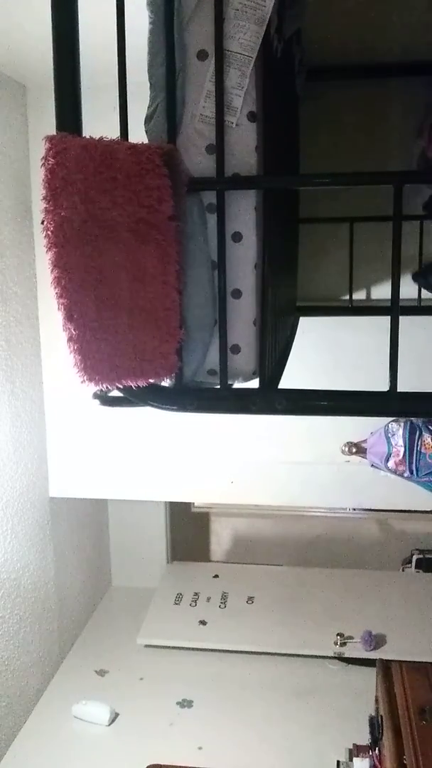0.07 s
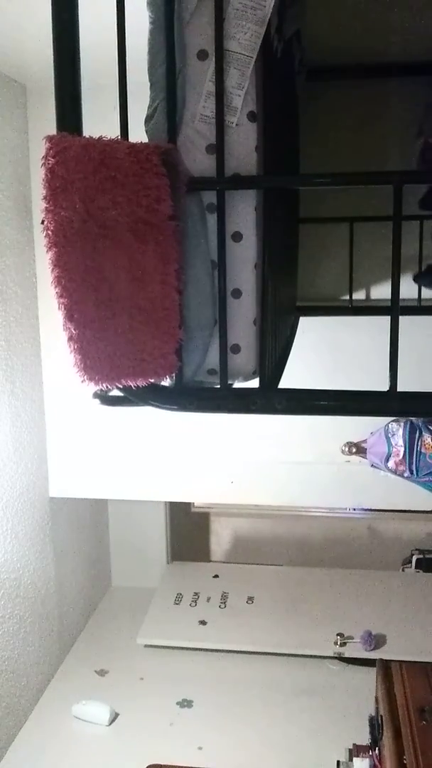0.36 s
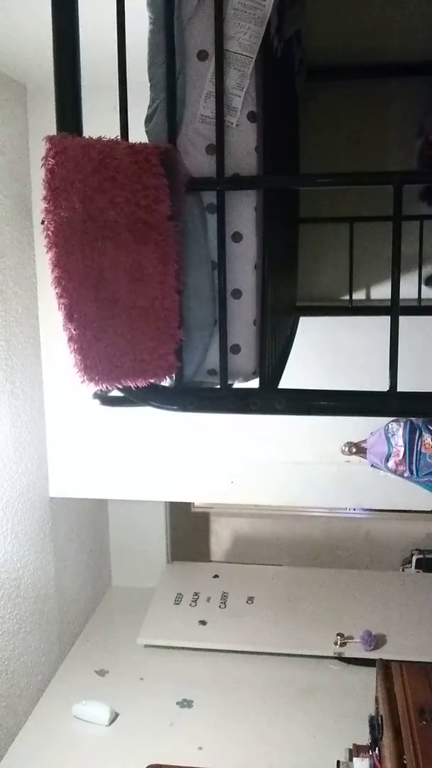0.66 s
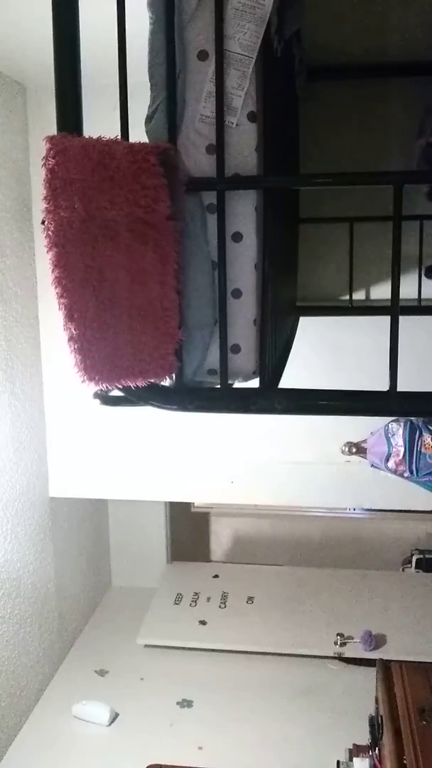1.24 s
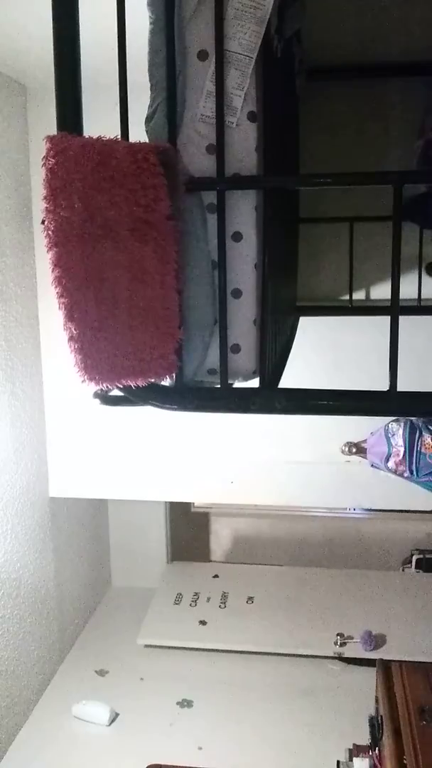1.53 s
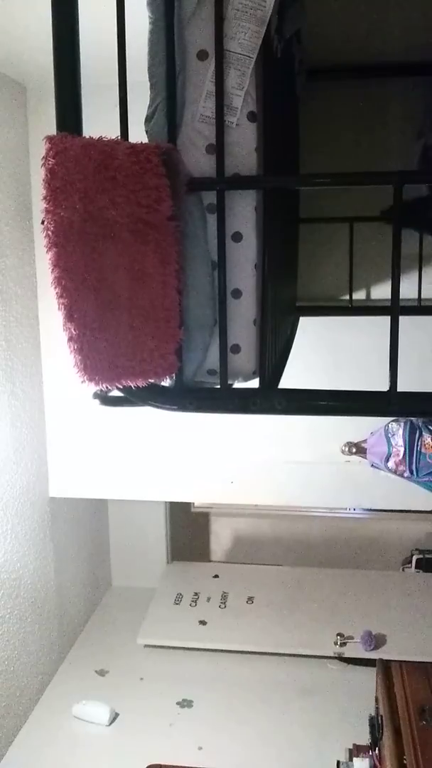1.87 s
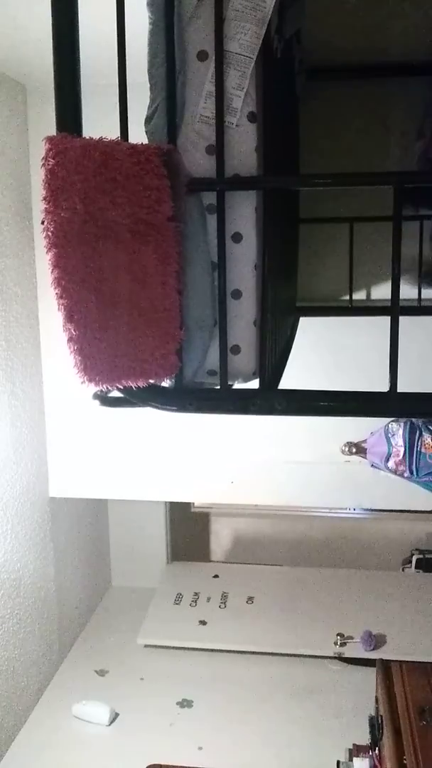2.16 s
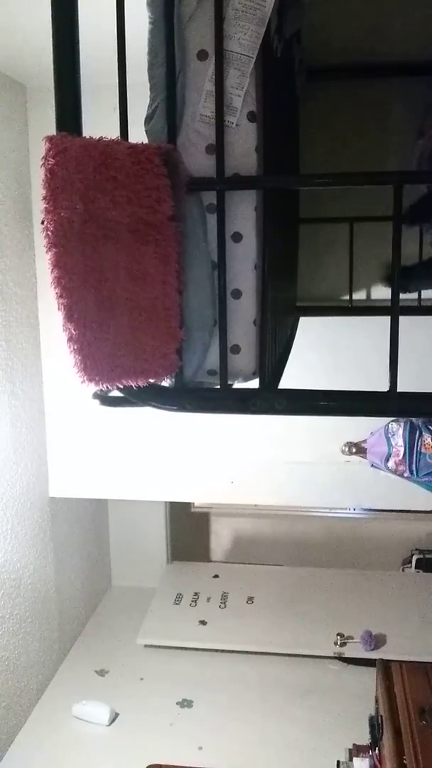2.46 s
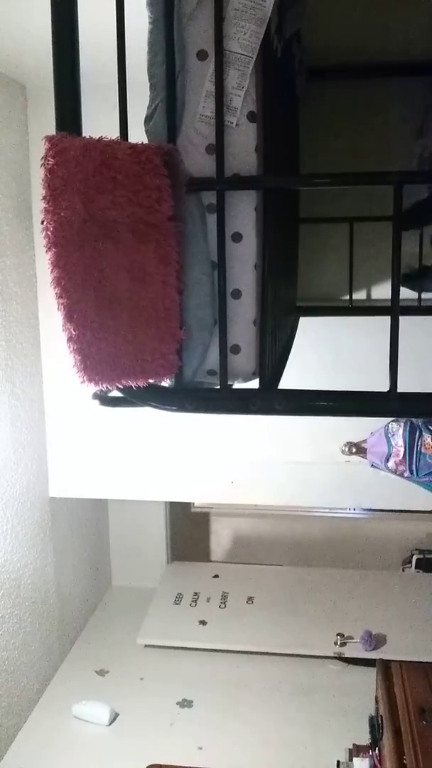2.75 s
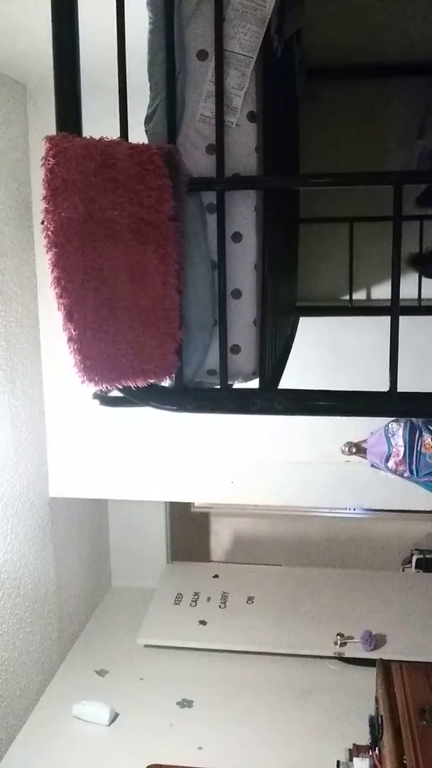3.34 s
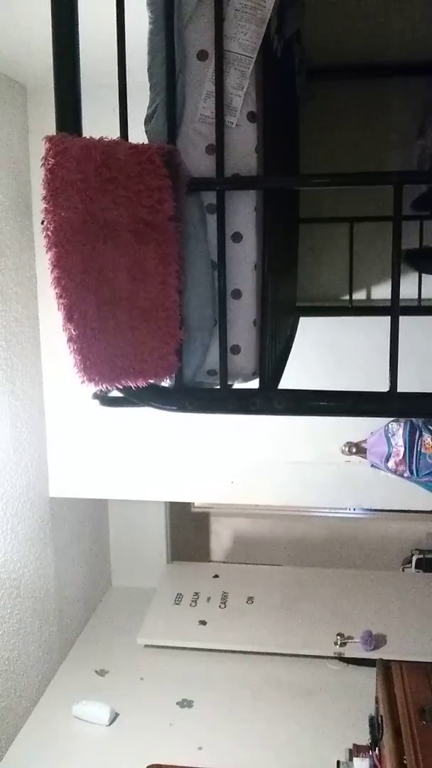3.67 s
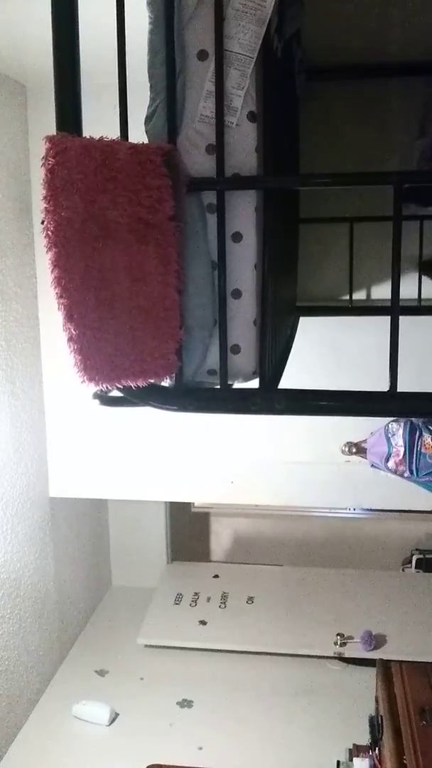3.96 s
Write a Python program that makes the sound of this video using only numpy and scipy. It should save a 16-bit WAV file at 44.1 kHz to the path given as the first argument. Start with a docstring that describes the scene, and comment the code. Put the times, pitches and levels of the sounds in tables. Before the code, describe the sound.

Irregular scratchy rustles come in brief clusters over steady hum and hiss in a bedroom.

```python
"""A small bedroom, where something dry, perhaps fabric, is scratched and rustled in short uneven strokes.
Each stroke is stick-slip friction: a dense run of tiny slips that rings briefly in the room.
A fan-like rush, a faint hum and hiss lie below, and the hand-held recorder is softly bumped and
knocked a few times. The stereo image of its two ports is widened by cross-subtraction."""
import sys
import numpy as np
from scipy import signal
from scipy.fft import rfft, irfft, next_fast_len
from scipy.io import wavfile
from scipy.ndimage import uniform_filter1d

SR = 44100
rng = np.random.default_rng(int(sys.argv[2]) if len(sys.argv) > 2 else 0)


def transcribe(u):
    """Save the signal u as a 16-bit wav file named by the first command-line argument.

    u: samples, shape (n,) or (channels, n), limited to [-1, 1]; the rate is SR.
    q: integer samples, one column per channel.
    """
    v = np.clip(np.atleast_2d(u).T, -1, 1)
    q = np.round(v * 32767).astype(np.int16)
    wavfile.write(sys.argv[1], SR, q)


N = 176400
TIME = np.arange(N) / SR
FFT_SIZE = next_fast_len(N + SR)
FREQS = np.arange(FFT_SIZE // 2 + 1) * SR / FFT_SIZE
SIDES = np.array([[1], [-1]])  # left, right
PORT_LAG_S = 0.0004441

# scratch strokes (start [s], length [s], relative level [dB], tilt [dB/octave])
STROKES = [(0.0, 0.0019, -43.5, -6), (0.251, 0.025, -47.5, -0.5), (.364, 0.031, -36, -1),
           (0.409, 0.058, -42, -3), (0.516, .09, -65, -11), (0.737, 0.061, -39.5, -0.5),
           (0.869, 0.062, -51.5, -2), (0.926, 0.011, -45, 10.5), (0.935, 0.0033, -45.5, -4),
           (1.065, 0.025, -47.5, 1.5), (1.235, 0.036, -36, -1.5), (1.276, 0.027, -47, -2.5),
           (1.366, 0.025, -48.5, 0), (1.535, 0.041, -38.5, 0), (1.688, 0.023, -39, -2),
           (1.833, .07, -61, 0), (1.911, 0.012, -53, 1.5), (1.984, 0.013, -57.5, -8),
           (2.134, 0.026, -44, -6.5), (2.233, 0.023, -45, 3.5), (2.303, .1, -63.5, -1),
           (2.42, 0.022, -47.5, -4), (2.512, 0.063, -38, 0), (2.582, 0.019, -44.5, -2.5),
           (2.771, 0.017, -44, -5), (2.868, 0.044, -41.5, -2), (2.927, 0.02, -41.5, 2),
           (3.04, 0.043, -51.5, -1), (3.308, 0.016, -46, 0.5), (3.423, 0.04, -49.5, -2.5),
           (3.451, 0.081, -43, -0.5), (3.603, 0.015, -52.5, -4.5), (3.707, 0.032, -49, -4.5),
           (3.758, 0.077, -37.5, 1), (3.903, 0.025, -35.5, 3), (3.973, .028, -48.5, 0)]
# broad spectrum of the scratched surface (frequency [Hz], relative level [dB])
SURFACE_SPECTRUM = [(150, -34), (500, 4.5), (2600, 2.5), (3800, 2.5), (7200, 5.5), (8500, -0.5),
                    (10500, -0.5), (12000, 4), (14500, -25.5)]
# narrow, steady treble peaks that the room gives every scratch (frequency [Hz], gain [dB])
ROOM_RESONANCES = [(2995, 4), (3150, 5), (3230, 5), (3600, 5.5), (4985, 6.5), (5615, 4), (5725, 3.5),
                   (5912, 10.5), (5985, 6), (7150, 5.5), (8162, 8.5), (10730, -0.5), (12170, 4.5)]
# cross-subtraction of the reverberation (frequency [Hz], share of the other port [ratio])
REVERB_CROSS = [(400, .02), (2200, 1), (4400, 0.35), (6000, 0.016), (9000, 0.084), (12000, 0.26)]
# spectrum of the rush (frequency [Hz], relative level [dB])
RUSH_SPECTRUM = [(20, -25), (55, -4), (500, -0.1), (800, -0.5), (1150, -3), (1600, -5.5), (2200, -22),
                 (4000, -42)]
# slow swell of its upper band (time [s], gain [dB])
RUSH_SWELL = [(0, -4), (.55, -0.5), (1.1, 0), (1.35, 2.5), (2.08, -0.5), (2.6, 3), (2.95, 3.5),
              (3.75, -1.8)]
# its balance (frequency [Hz], left minus right [dB])
RUSH_BALANCE = [(60, -6), (130, -2.5), (350, 1.5), (600, -1.5), (1100, -0.5)]
# its stereo image (frequency [Hz], coherence [0-1], phase lead of the right [rad])
RUSH_IMAGE = [(55, .87, -1.8), (260, .7, -.7), (470, .75, .1), (680, .45, .9), (880, .8, 0),
              (1150, .98, .05), (1400, .87, .6), (1700, .8, 1.6), (2200, .95, 3.1)]
# spectrum of the hiss (frequency [Hz], relative level [dB])
HISS_SPECTRUM = [(2200, 10.5), (4500, 7), (9000, 4.5), (12000, 5), (14400, -6.5)]
# cross-subtraction of the hiss (frequency [Hz], share of the other port [ratio])
HISS_CROSS = [(2200, 1), (4500, 0.38), (6000, 0.08), (12000, 0.063)]
# rise of the hum (time [s], level [dB])
HUM_LEVEL = [(3.1, -73), (3.4, -55)]
# soft bumps of the hand (start [s], length [s], level [dB], resonance [Hz])
BUMPS = [(1.226, 0.029, -44, 215), (1.828, 0.092, -44.5, 106), (1.833, 0.016, -39.5, 580),
         (1.863, 0.029, -39.5, 330), (2.195, 0.038, -39.5, 217), (2.198, 0.045, -40, 477),
         (2.23, 0.015, -36, 112), (2.287, 0.016, -37.5, 445), (2.777, 0.014, -39.5, 604),
         (2.787, 0.046, -42.5, 380)]
# fingertip knocks on the case (centre time [s], envelope peak [dB], frequency [Hz])
KNOCKS = [(1.6372, -27.5, 303), (2.2565, -31.5, 263)]


def from_db(db):
    """Amplitude grows tenfold for every 20 dB."""
    return 10 ** (np.asarray(db) / 20)


def unit_rms(x):
    """Normalisation to unit mean power."""
    return x / np.sqrt(np.mean(x ** 2) + 1e-20)


def at_hz(points):
    """Interpolation of a table on a log-frequency axis."""
    hz, value = np.transpose(points)
    return np.interp(np.log(FREQS + 1), np.log(hz), value)


def filtered(x, response):
    """Convolution in time is multiplication in frequency."""
    return irfft(rfft(x, FFT_SIZE) * response, FFT_SIZE)[..., :N]


def minimum_phase(gain):
    """Causality: a response with this gain that rings only after it is excited."""
    cepstrum = irfft(np.log(gain + 1e-9), FFT_SIZE)
    return np.exp(rfft(cepstrum * (1 + np.sign(np.fft.fftfreq(FFT_SIZE)))))


def add(out, start, sound):
    """Superposition: a sound joins the mix at its start time."""
    i = int(start * SR)
    part = sound[..., :N - i]
    out[..., i:i + part.shape[-1]] += part


def port_delay():
    """Travel time between the ports gives a phase lag proportional to frequency."""
    return np.exp(-2j * np.pi * FREQS * PORT_LAG_S)


def widen(ports, shares):
    """Differential pickup: each channel is its own port minus a delayed share of the other."""
    share = np.clip(at_hz(shares), 0, 1)
    norm = 1 / np.sqrt(1 + share ** 2)
    return filtered(ports, norm) - filtered(ports[::-1], norm * share * port_delay())


def contact_pressure(t, length, sag_db_per_s=59, release_s=0.01):
    """Contact envelope: pressure builds, more slowly in a long stroke, then sags and lets go."""
    attack_s = 0.0056 + 0.18 * length
    release = np.exp(-np.maximum(t - length, 0) / release_s)
    return np.clip(t / attack_s, 0, 1) * from_db(-sag_db_per_s * t) * release


def slips(slips_per_s=2800, size_spread_db=2, spot_spread_db=0.9):
    """Stick-slip friction: each stroke releases a random train of impulses of uneven size."""
    out, size = np.zeros(N), SR // 4
    t = np.arange(size) / SR
    octaves = np.log2(np.clip(np.fft.rfftfreq(size, 1 / SR), 1500, SR / 2) / 6000)
    knots = np.linspace(octaves[0], octaves[-1], 24)
    for start, length, db, tilt in STROKES:
        strengths = from_db(size_spread_db * np.minimum(rng.exponential(1, size), 4))
        strengths *= rng.choice([-1, 1], size)
        impulses = unit_rms(strengths * (rng.random(size) < slips_per_s / SR))
        # each stroke meets a different spot of the surface, with its own colour
        spot = np.interp(octaves, knots, rng.standard_normal(len(knots)))
        tint = from_db(db + tilt * octaves + spot_spread_db * spot)
        add(out, start, irfft(rfft(impulses * contact_pressure(t, length)) * tint, size))
    return out


def scratches(peak_width_hz=54, source_db=-0.03, direct_db=-1, reverb_db=0.5):
    """Source and filter: slips take the surface's colour and the room's resonances, then reverberate."""
    room_peaks_db = sum(db / (1 + (2 * (FREQS - hz) / peak_width_hz) ** 2) for hz, db in ROOM_RESONANCES)
    colour = unit_rms(from_db(at_hz(SURFACE_SPECTRUM) + room_peaks_db))
    source = from_db(source_db) * filtered(slips(), minimum_phase(colour))
    far_port = np.where(FREQS > 700, -port_delay(), 1)  # late and inverted above 700 Hz
    direct = np.array([source, filtered(source, far_port)])
    return from_db(direct_db) * direct + from_db(reverb_db) * widen(bedroom(source), REVERB_CROSS)


def bedroom(x, t60_s=0.27, treble_t60_s=0.16, smoothing_hz=90):
    """Reverberation: diffuse reflections decay exponentially at both ports, the treble sooner."""
    white = rng.standard_normal((2, N))
    low = filtered(white, 1 / (1 + (FREQS / 7000) ** 4))
    tail = low * from_db(-60 * TIME / t60_s) + (white - low) * from_db(-60 * TIME / treble_t60_s)
    response = rfft(tail * (TIME > 0.003), FFT_SIZE)  # first reflection after 3 ms
    band_power = uniform_filter1d(abs(response) ** 2, size=int(smoothing_hz * FFT_SIZE / SR))
    mid, side = response / np.sqrt(band_power)  # even in colour
    return filtered(x, (mid + SIDES * side) / np.sqrt(2))


def rush(base_db=-42, swell_from_hz=850):
    """Partial coherence: fan-like noise, partly alike in both channels, whose upper band swells."""
    coherence = at_hz([(hz, alike) for hz, alike, _ in RUSH_IMAGE])
    phase = at_hz([(hz, lead) for hz, _, lead in RUSH_IMAGE])
    mid, side = rng.standard_normal((2, N))
    air = filtered(mid, np.sqrt(1 + coherence)) + SIDES * filtered(side, np.sqrt(1 - coherence))
    colour = from_db(at_hz(RUSH_SPECTRUM) + SIDES * at_hz(RUSH_BALANCE) / 2)
    air = unit_rms(filtered(air, colour * np.exp(-1j * SIDES * phase / 2)))
    upper = air - filtered(air, 1 / (1 + (FREQS / swell_from_hz) ** 2))
    swell = from_db(np.interp(TIME, *np.transpose(RUSH_SWELL)))
    return from_db(base_db) * (air + upper * (swell - 1))


def hiss(level_db=-57):
    """Stationary broadband noise, independent at each port until cross-subtraction."""
    noise = widen(rng.standard_normal((2, N)), HISS_CROSS)
    return from_db(level_db) * unit_rms(filtered(noise, from_db(at_hz(HISS_SPECTRUM))))


def hum(fundamental_hz=76.26, width_hz=3.5, fall_db=2.5):
    """A harmonic series: three narrow noise bands, each weaker than the last, swelling near the end."""
    lines = sum(from_db(-fall_db * k) / (1 + (2 * (FREQS - k * fundamental_hz) / width_hz) ** 2)
                for k in (1, 2, 3))
    level = from_db(np.interp(TIME, *np.transpose(HUM_LEVEL)))
    return level * unit_rms(filtered(rng.standard_normal(N), lines))


def bumps(q=2.6, side_db=-4):
    """Damped resonance: each dull rub of the hand drives one broad low mode."""
    out, size = np.zeros((2, N)), SR // 4
    t = np.arange(size) / SR
    for start, length, db, hz in BUMPS:
        mid, side = rng.standard_normal((2, size))
        force = (mid + from_db(side_db) * SIDES * side) * contact_pressure(t, length)
        ringing = signal.lfilter(*signal.iirpeak(hz, q, fs=SR), force)
        thud = signal.lfilter(*signal.butter(2, 2 * hz, fs=SR), ringing)
        add(out, start, from_db(db) * unit_rms(thud) * np.sqrt(length * SR / size))
    return out


def knocks(half_width_cycles=0.91):
    """Impact: a fingertip on the case gives one dull pulse, a few cycles in a Gaussian envelope."""
    out = np.zeros(N)
    for centre_s, db, hz in KNOCKS:
        cycles = (TIME - centre_s) * hz
        out += from_db(db) * np.exp(-(cycles / half_width_cycles) ** 2) * np.sin(2 * np.pi * cycles)
    return out


def scene():
    """Superposition: scratches, bumps and knocks add to the background of the room."""
    return scratches() + bumps() + knocks() + hiss() + hum() + rush()


def record(dry):
    """Band limiting: a steep low-pass removes the highest treble."""
    cutoff_hz = 14500
    return filtered(dry, 1 / np.sqrt(1 + (FREQS / cutoff_hz) ** 240))


dry = scene()
out = record(dry)
transcribe(out)
```